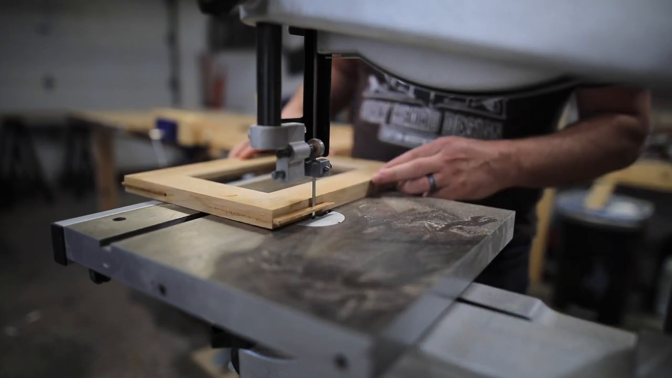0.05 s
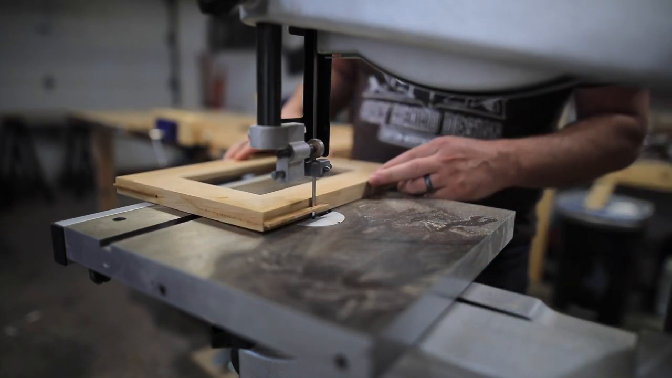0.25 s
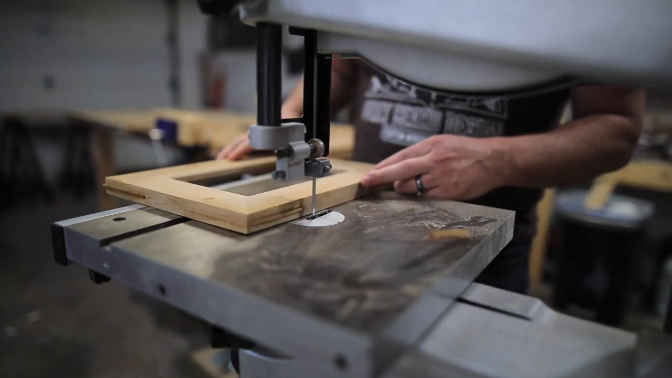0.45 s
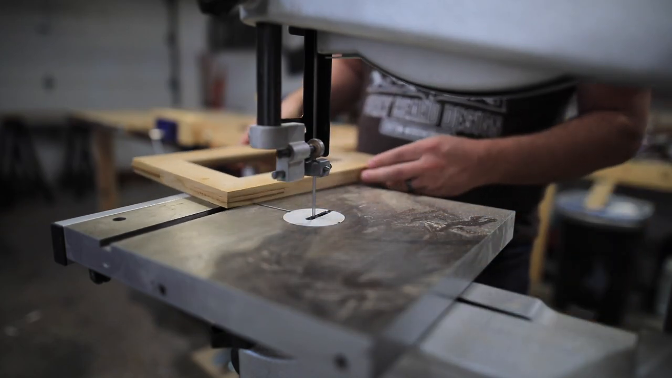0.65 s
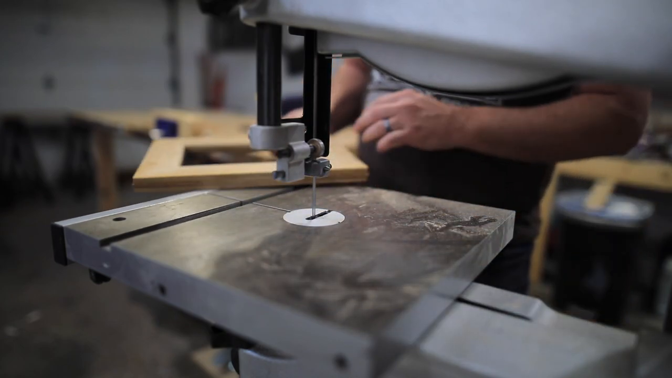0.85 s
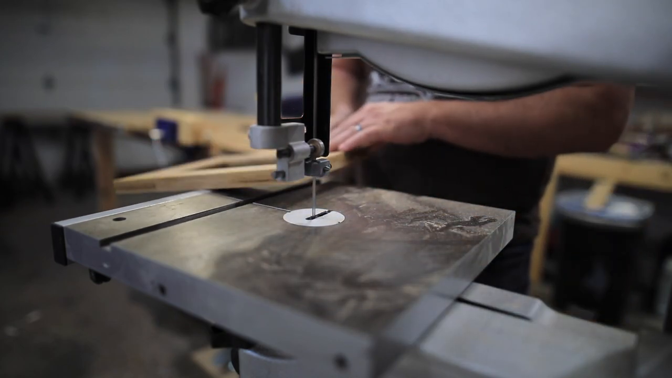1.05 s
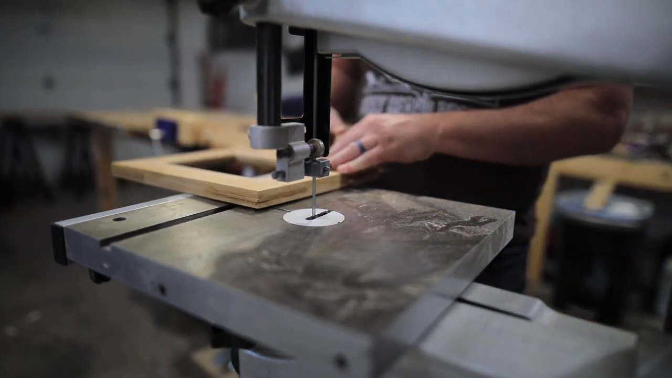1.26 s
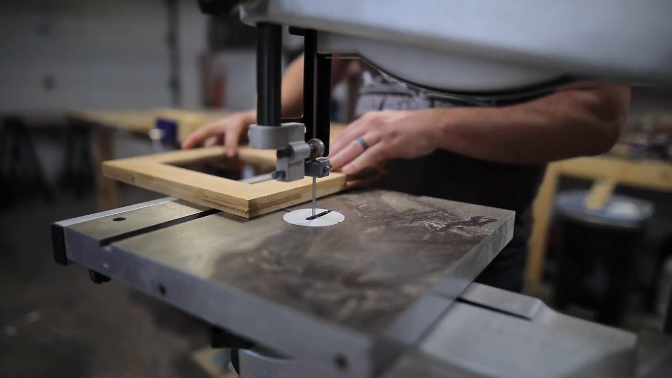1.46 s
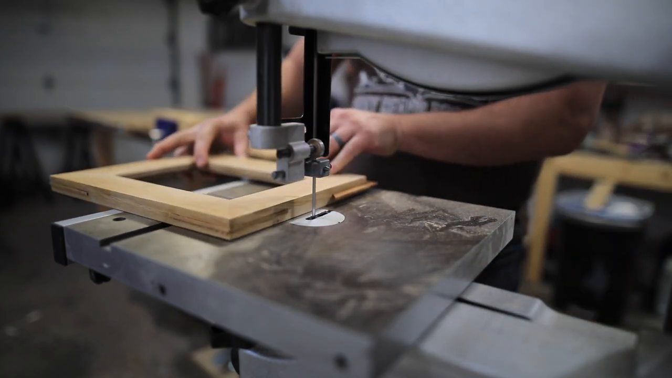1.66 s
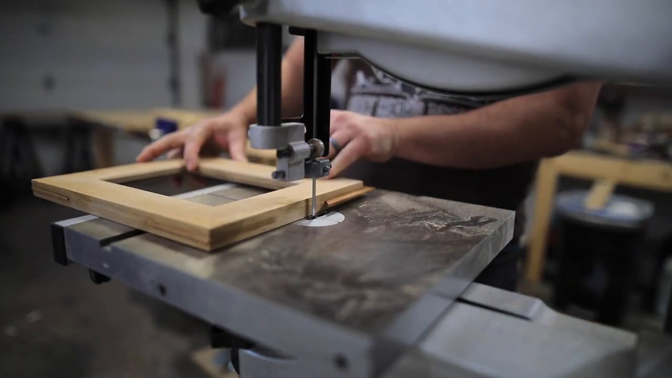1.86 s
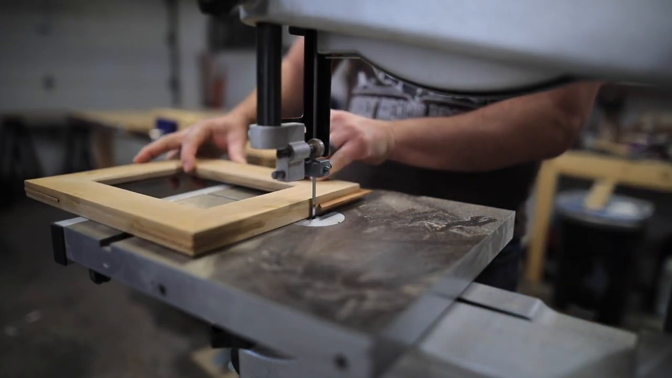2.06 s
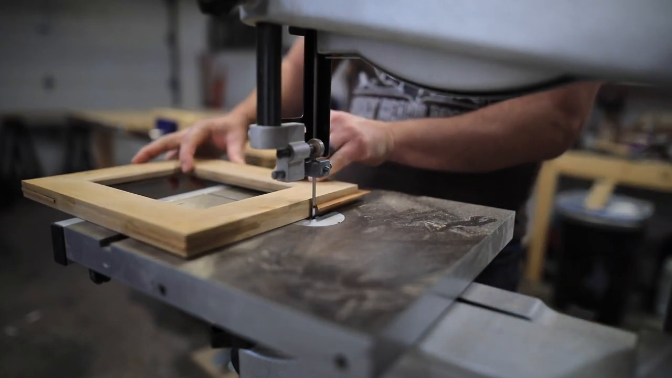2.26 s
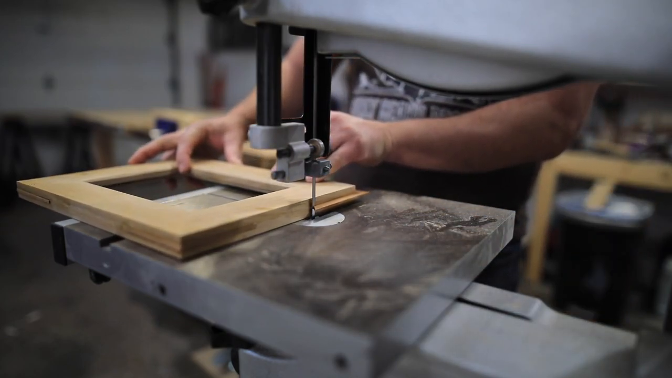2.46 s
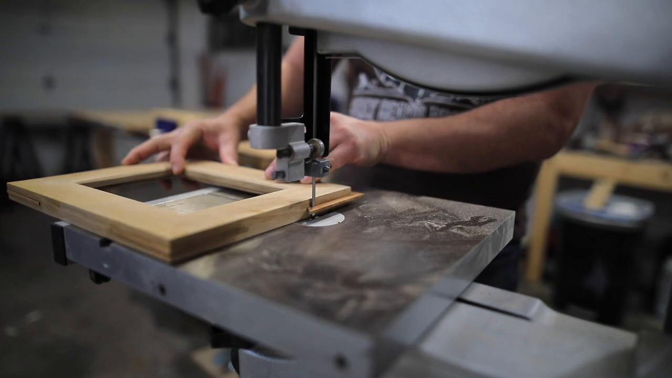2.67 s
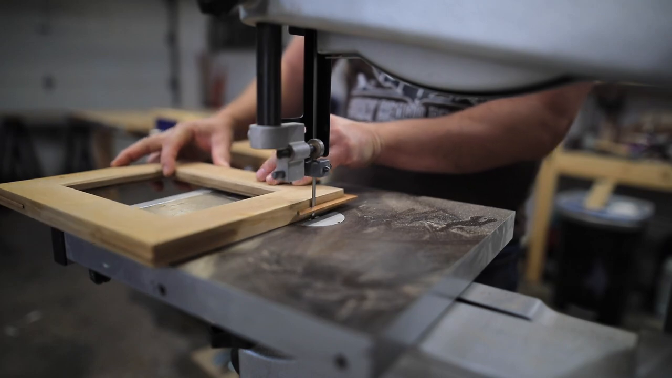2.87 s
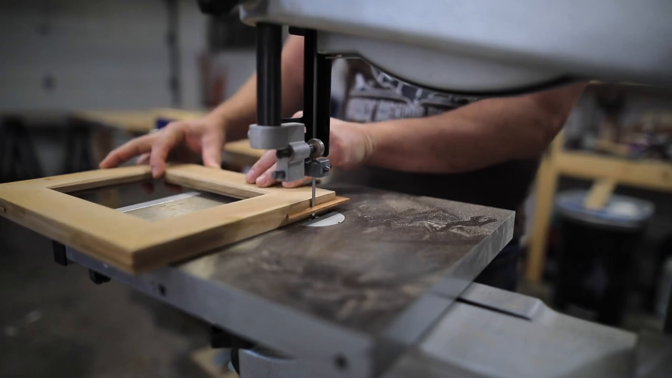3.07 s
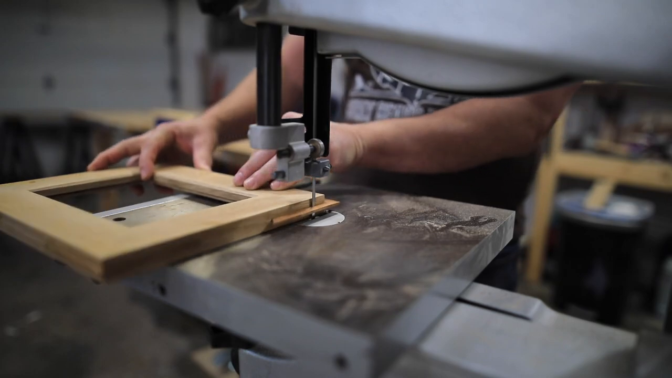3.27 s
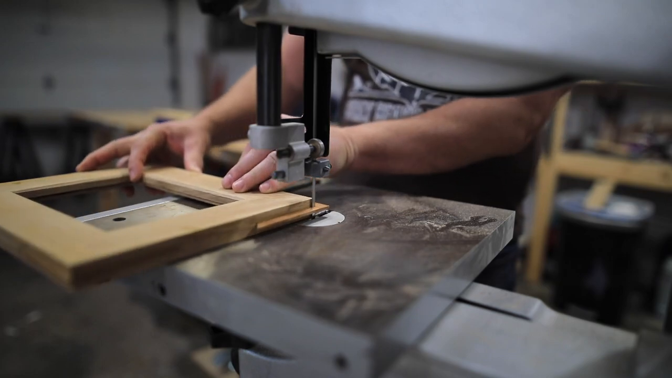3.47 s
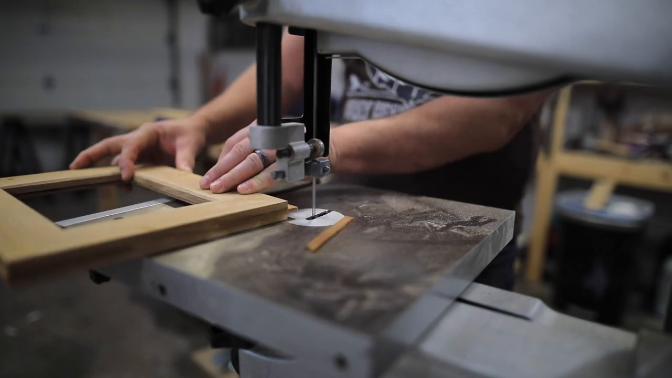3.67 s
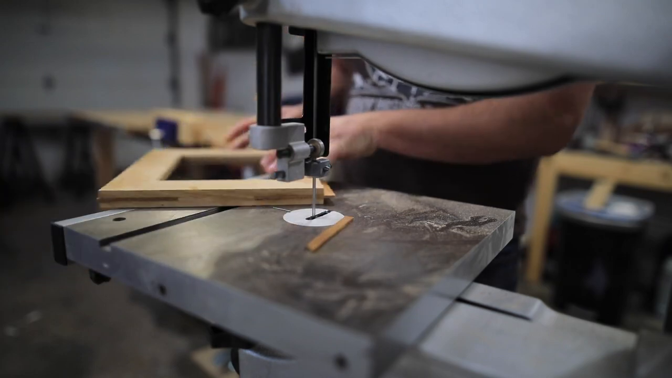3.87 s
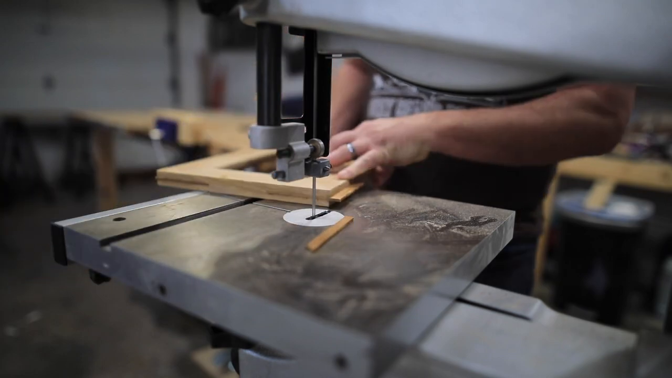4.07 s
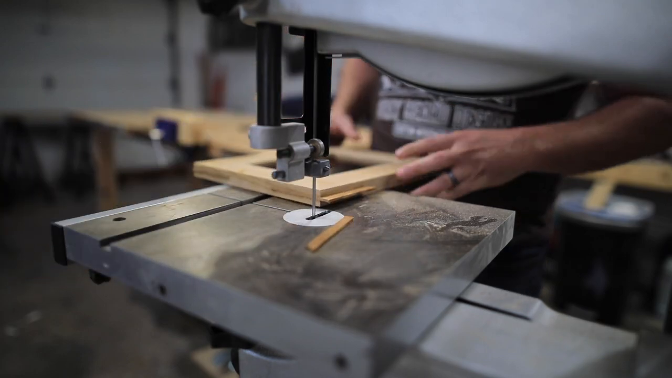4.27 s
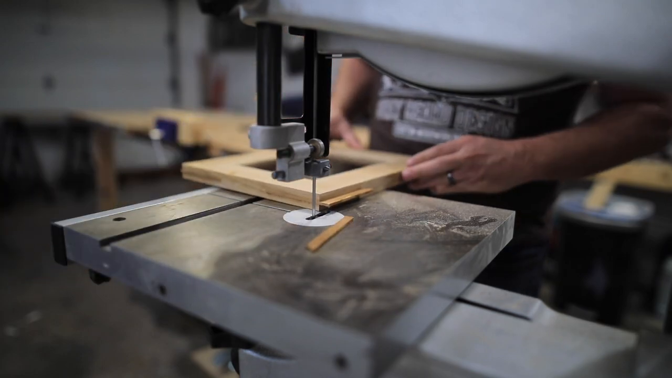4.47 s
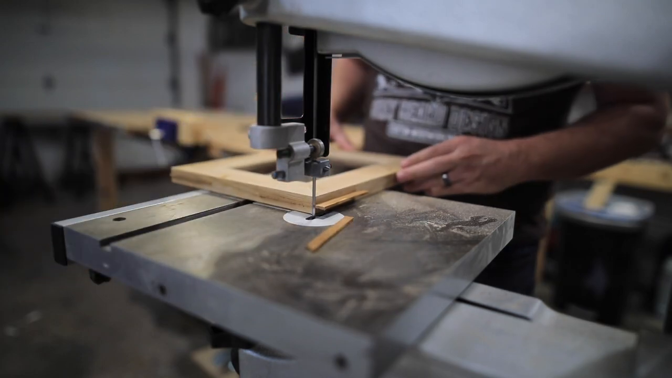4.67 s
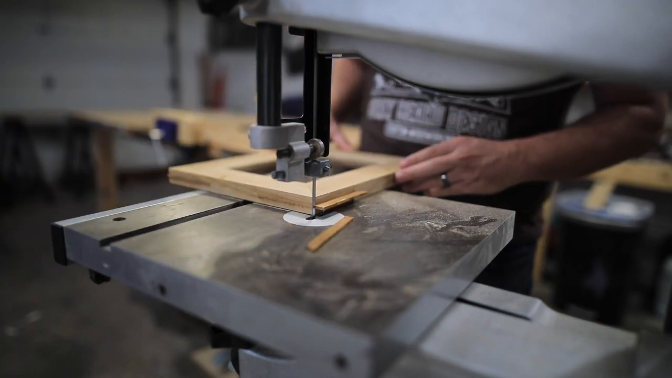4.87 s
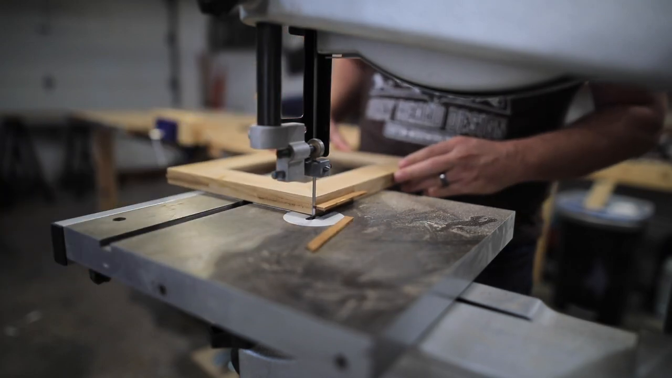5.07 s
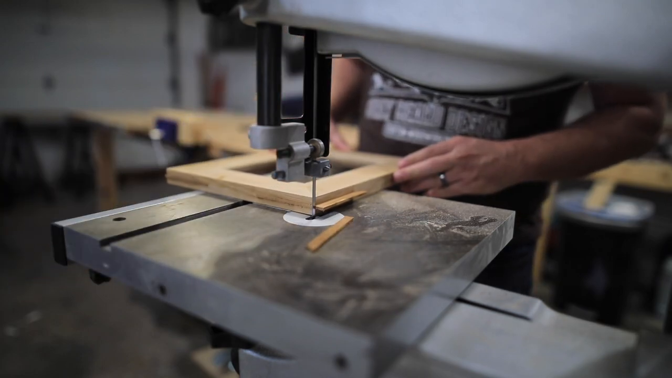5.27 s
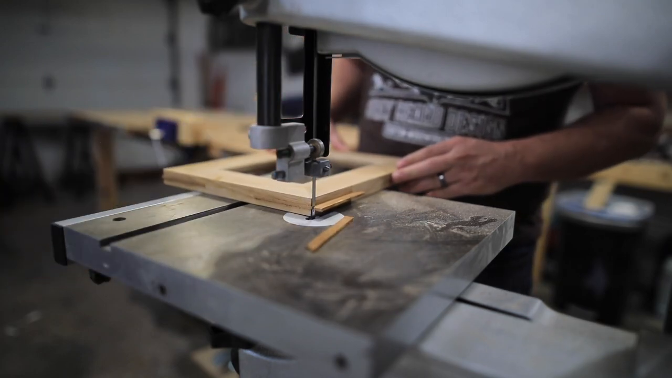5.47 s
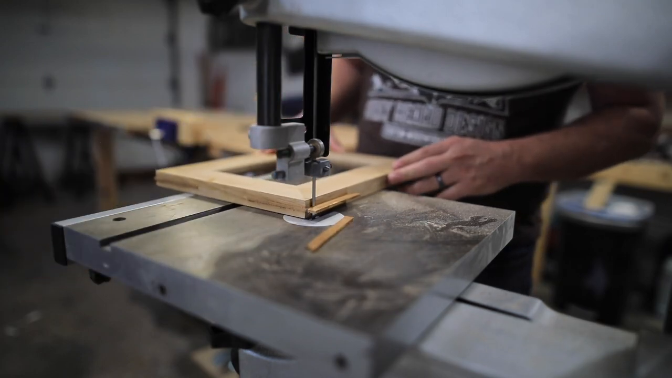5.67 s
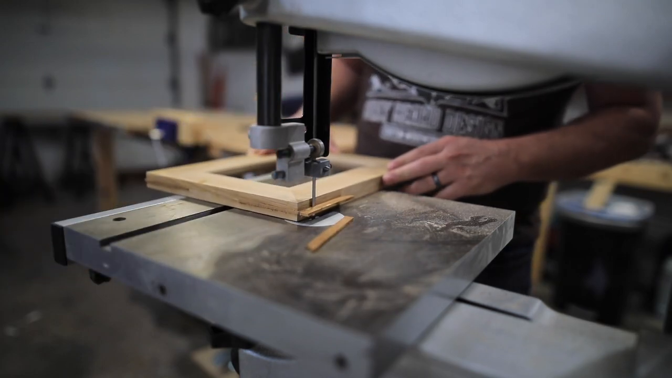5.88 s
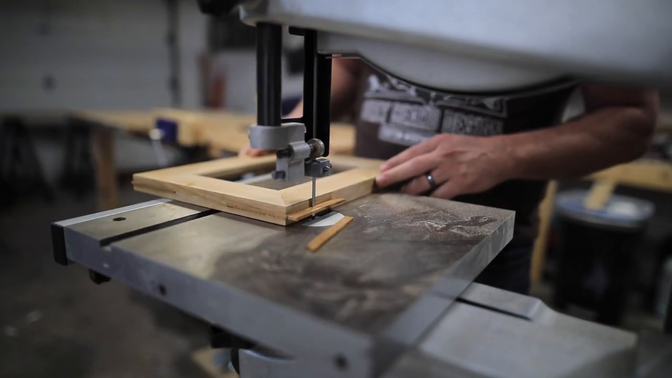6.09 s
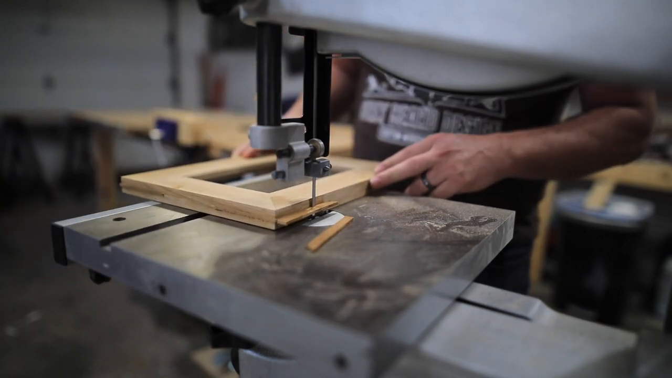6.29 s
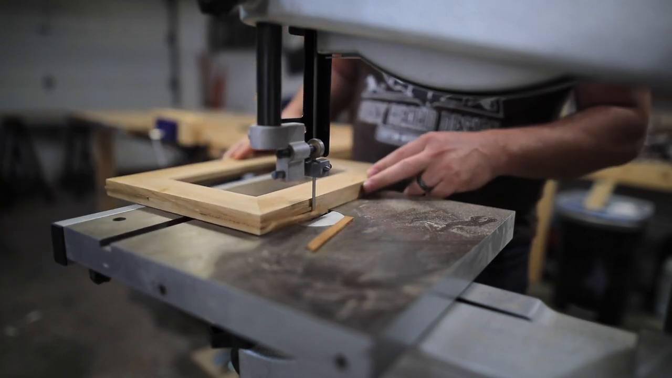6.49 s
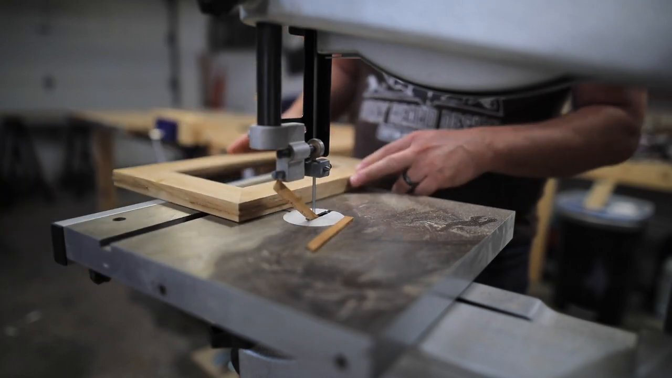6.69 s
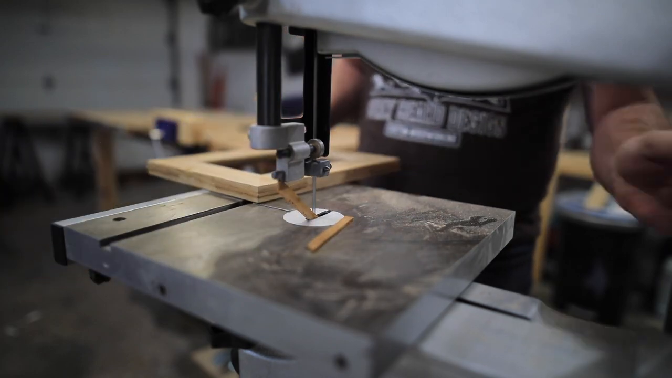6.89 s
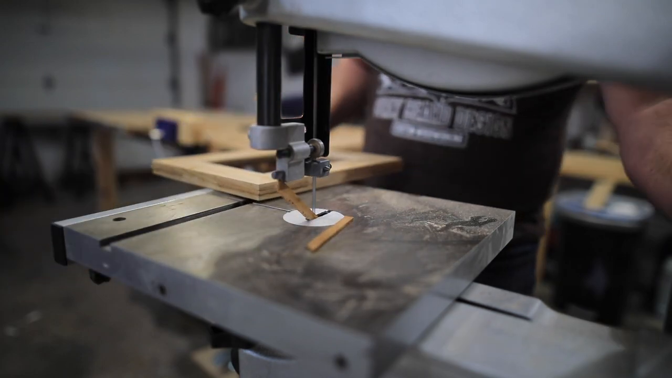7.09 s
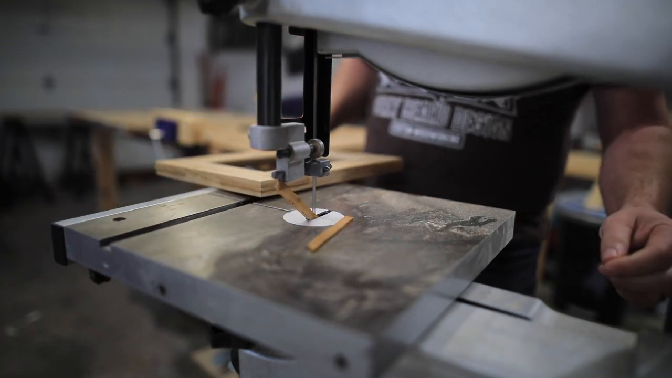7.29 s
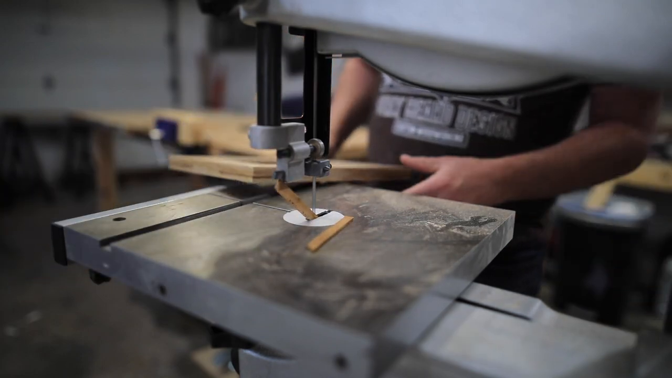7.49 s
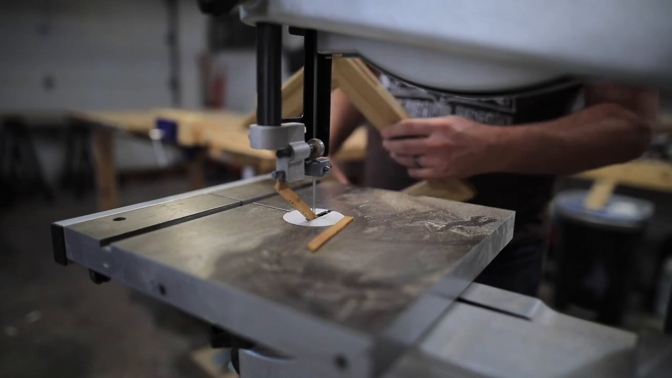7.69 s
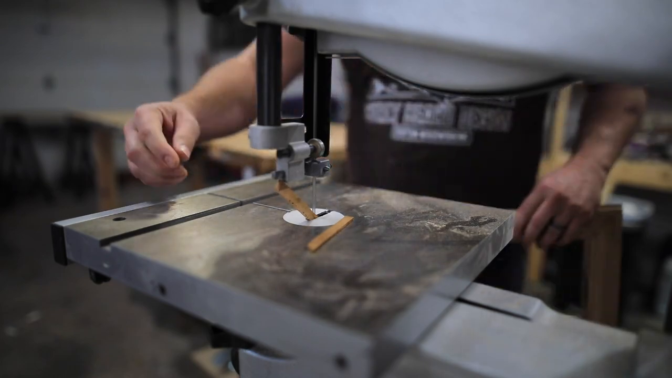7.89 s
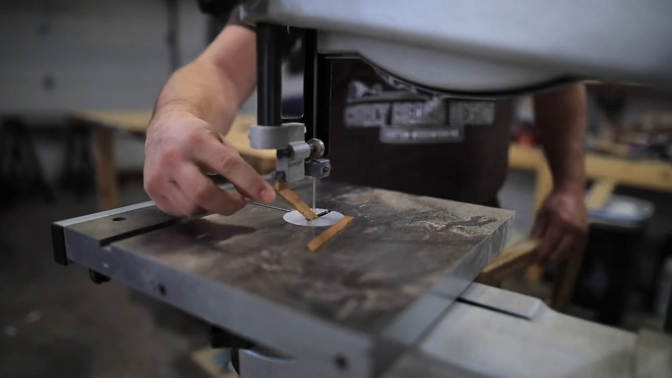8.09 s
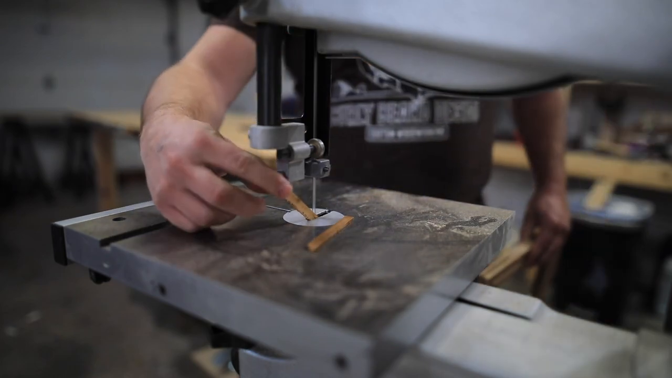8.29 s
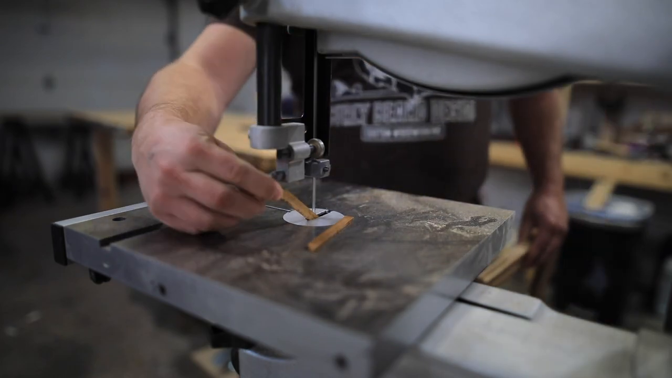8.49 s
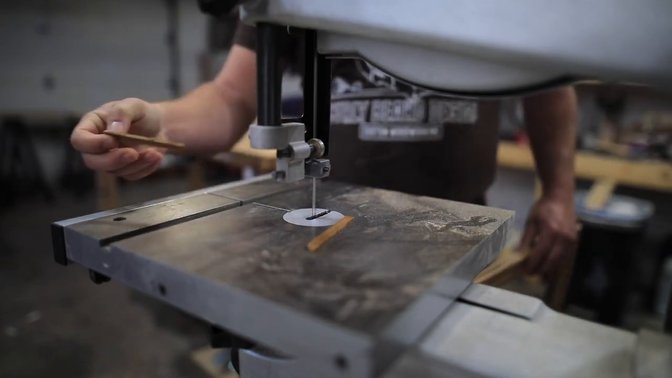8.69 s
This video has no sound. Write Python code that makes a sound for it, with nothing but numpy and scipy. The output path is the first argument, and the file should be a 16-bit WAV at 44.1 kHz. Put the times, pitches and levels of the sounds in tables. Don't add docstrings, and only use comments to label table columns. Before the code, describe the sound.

Shrill, rough metallic squealing as a saw blade bites wood in bursts, humming and hissing between cuts, before the machine winds down amid small wooden knocks.

```python
import sys
import numpy as np
from scipy import signal
from scipy.fft import rfft, irfft, next_fast_len
from scipy.io import wavfile
from scipy.ndimage import uniform_filter1d, map_coordinates

SR = 44100
rng = np.random.default_rng(int(sys.argv[2]) if len(sys.argv) > 2 else 0)


def to_linear_factor(level_db):
    exponent = np.asarray(level_db, float) / 20
    return 10 ** exponent


def generate_wav(signal):
    frames = np.transpose(np.atleast_2d(signal))
    scaled = np.clip(frames, -1, 1) * 32767
    pcm = np.round(scaled).astype(np.int16)
    wavfile.write(sys.argv[1], SR, pcm)


N = 385421
TIME = np.arange(N) / SR
SPIN_HZ = 104.35
SWITCH_OFF_S, HUM_DIES_S = 7.08, 0.062


def unit(x):
    return x / np.sqrt(np.mean(np.abs(x) ** 2) + 1e-20)


def curves(rows):
    s, *cols = np.transpose(rows)
    return [np.interp(TIME, s, c) for c in cols]


def ramp(s, length):
    return np.clip((TIME - s) / length, 0, 1)


def swell(s, length, db):
    return to_linear_factor(db) * np.exp(-((TIME - s) / length) ** 2)


def flares(rows):
    return sum(swell(*row) for row in rows)


def wobble(rate):
    return map_coordinates(rng.standard_normal(int(N * rate / SR) + 4), [TIME * rate])


def fuzz(width_hz, count=N):
    m = next_fast_len(count + 4096)
    bell = np.exp(-np.log(4) * (np.fft.fftfreq(m, 1 / SR) / width_hz) ** 2)
    noise = rng.standard_normal(m) + 1j * rng.standard_normal(m)
    return unit(np.fft.ifft(bell * noise)[:count])


def tone(hz):
    return np.sqrt(2) * np.exp(2j * np.pi * np.cumsum(hz + np.zeros(N)) / SR)


def band(hz, width_hz):
    phasor = np.sqrt(2) * np.exp(2j * np.pi * np.cumsum(hz) / SR)
    return (fuzz(width_hz, count=len(hz)) * phasor).real


def resonance(modes, hz):
    return sum(to_linear_factor(2 * db) / (1 + (2 * (hz - c) / w) ** 2) ** 2 for c, w, db in modes)


def rush(spectrum=None, modes=()):
    m = next_fast_len(N)
    f = np.fft.rfftfreq(m, 1 / SR) + 1
    power = resonance(modes, f)
    if spectrum:
        hz, db = np.transpose(spectrum)
        power = to_linear_factor(2 * np.interp(np.log(f), np.log(hz), db, left=-120, right=-120))
    return unit(irfft(rfft(rng.standard_normal(m)) * np.sqrt(power), m)[:N])


def patchy(x, depth_db):
    z = signal.stft(x, nperseg=512)[2]
    field = uniform_filter1d(rng.standard_normal(z.shape), size=4, axis=0)
    field = uniform_filter1d(field, size=8, axis=1)
    return unit(signal.istft(z * to_linear_factor(depth_db * unit(field)), nperseg=512)[1][:N])


# t/s, share of full speed
SPEED = [(0, 1), (7.05, 1), (7.75, 0.47), (8.5, 0.002), (8.74, 0.003)]
# t/s, hum level/dB
STRAIN = [(0.0, -47), (0.2, -46), (0.87, -50.5), (1.87, -52.5), (2.3, -51.5), (2.63, -46.5), (2.94, -48.5),
          (3.55, -47.5), (3.63, -53), (3.78, -50), (4.0, -49), (4.25, -49.5), (4.97, -50), (5.5, -47),
          (6.52, -46.5), (7.08, -50.5)]
STRAIN_REST_DB = -50


def running(rest_db, follows, slowing_db, stop_db):
    strain_db = (curves(STRAIN)[0] - STRAIN_REST_DB) * (1 - ramp(SWITCH_OFF_S, HUM_DIES_S))
    coasting_db = slowing_db * np.log10(curves(SPEED)[0] + 0.0063)
    return to_linear_factor(rest_db + follows * strain_db + coasting_db - stop_db * ramp(8.4, 0.11))


# t/s, squeal level/dB
CUTS = [
    [(0.0, -30.5), (0.1, -34), (0.17, -27.5), (0.39, -41), (0.43, -34), (0.48, -53.5)],
    [(2.395, -52), (2.44, -39), (2.56, -24.5), (2.985, -25), (2.998, -29), (3.05, -26), (3.29, -30),
     (3.53, -26), (3.66, -60)],
    [(4.895, -58), (4.92, -35), (4.985, -54), (5.008, -29.5), (5.045, -37.5), (5.075, -32), (5.135, -42),
     (5.155, -33.5), (5.185, -51)],
    [(5.36, -35.5), (5.52, -27.5), (5.66, -30.5), (5.88, -39.5), (6.07, -26.5), (6.325, -25), (6.35, -39),
     (6.57, -28.5), (6.64, -64.5)],
]


def load():
    gate = 0
    for rows in CUTS:
        start, end = rows[0][0], rows[-1][0]
        edge = np.minimum(TIME - start + (start == 0), end - TIME)
        gate = gate + np.clip(edge / 0.019, 0, 1)
    return gate


# f/Hz, width/Hz, steady share 0-1, level/dB of sidebands at -2..2 times twice the spin
SQUEAL = [(8149, 26, .8, [-20, -13, 0, -16, -27]), (8174, 20, .7, [-21, -14, -9, -19, -29]),
          (8125, 24, .5, [-27, -23, -11, -21, -40]), (8059, 14, .5, [-34, -26, -24, -26, -40]),
          (8155, 90, .0, [-25, -19, -9, -20, -34]), (8080, 400, .0, [-40, -40, -16, -40, -40]),
          (8449, 10, .6, [-60, -60, -25, -60, -60])]


def squeal():
    out = 0
    for hz, width_hz, steady, sidebands_db in SQUEAL:
        chop = 0
        for order, db in zip(range(-2, 3), sidebands_db):
            chop = chop + to_linear_factor(db) * 1j ** (abs(order) * 2 / 3) * tone(2 * order * SPIN_HZ)
        strength = steady + (1 - steady) * fuzz(width_hz)
        out = out + strength * chop * tone(hz + 2.68 * wobble(12))
    return unit(out.real)


# f/Hz, level/dB
IDLE = [(2500, -12), (4800, -22), (6000, -11.5), (6500, -15.5), (9200, -11), (12200, -20), (13450, -26),
        (13600, -24.5), (15800, -30)]
# f/Hz, width/Hz, level/dB
GUIDES = [(5160, 70, -5.5), (6880, 200, 4), (7970, 220, 2.5), (9200, 130, 4), (9350, 100, 5),
          (10820, 80, 8), (11700, 82, 2.5), (11920, 220, 5), (12600, 250, 0), (14100, 126, -3.5)]
# f/Hz, width/Hz, level/dB
FRAME = [(2523, 40, -2.5), (3140, 35, -4.5), (3300, 52, -1), (3895, 110, 1.5), (4260, 30, 0),
         (4900, 30, -15), (5190, 280, -8)]


def idle_rub(gate):
    idle = to_linear_factor(2.0) * patchy(rush(IDLE), depth_db=2.5) + rush(modes=GUIDES)
    idle = idle + to_linear_factor(-7.5) * rush(modes=FRAME)
    wedged = to_linear_factor(-7.0) * rush([(9000, -19), (12500, -6), (13500, 5.0), (15800, -2)])
    wedged = (TIME > CUTS[-1][-1][0]) * wedged
    friction = running(rest_db=-54, follows=1, slowing_db=20.5, stop_db=-10)
    return friction * ((1 - gate) * idle + wedged)


# f/Hz, level/dB
KERF = [(6000, -28), (7300, 5.5), (8800, 5.5), (9300, 3), (11000, -1.5), (13000, -10), (14000, -11),
        (15800, -8)]
# f/Hz, level/dB
RASP = [(1200, -9.5), (2200, -5), (4000, -1.5), (5400, 2), (6500, 3.5), (7400, -8), (8500, -39)]
# f/Hz, width/Hz, level/dB
GRAIN = [(2320, 56, -9), (2795, 28, -3.5), (3140, 60, -7.5), (4040, 51, -1), (4250, 22, -3.5),
         (4450, 17, -10), (4830, 26, -11), (5050, 42, -8), (5390, 29, -1.5), (5520, 27, -1), (5720, 37, -3),
         (6030, 46, -6), (6590, 66, -6)]
# t/s, length/s, level/dB
SQUEAL_FLARES = [(2.416, 0.0068, -31), (2.68, 0.0099, -35), (2.984, 0.012, -30), (3.45, 0.057, -36),
                 (6.56, 0.018, -30)]
LOWER_FLARES = [(.2, 0.42, -51), (2.66, 0.054, -47), (3.445, 0.11, -40.5), (4.93, 0.018, -49),
                (5.06, 0.055, -51), (5.563, 0.16, -42.5), (6.55, 0.05, -53)]
UPPER_FLARES = [(2.86, 0.074, -47), (3.581, 0.059, -29), (5.14, 0.025, -49), (6.3, 0.13, -60)]
RASP_FLARES = [(3.3, 0.28, -51), (3.6, 0.037, -50), (5.55, 0.18, -51)]
KERF_FLARES = [(.45, 0.05, -57), (3.63, 0.015, -49), (5.09, 0.1, -50), (5.45, 0.024, -38),
               (2.415, 0.0043, -57), (6.6, .03, -63)]


def cutting():
    squeal_db, = curves(np.concatenate(CUTS))

    def bitten(level_db, share, jolts):
        return to_linear_factor(level_db + share * (squeal_db + 30)) + flares(jolts)

    whine = (to_linear_factor(squeal_db + 0.25 * wobble(25)) + flares(SQUEAL_FLARES)) * squeal()
    lower = rush(modes=[(7000, 150, 12.0), (7200, 180, -14.5)])
    upper = rush(modes=[(12400, 44, 15.0), (12300, 150, 4), (12650, 170, 6.5), (11100, 70, -13.0)])
    rings = bitten(-53, 0.12, LOWER_FLARES) * to_linear_factor(2.5 * wobble(30)) * lower
    rings = rings + bitten(-53.5, 0.15, UPPER_FLARES) * to_linear_factor(1.54 * wobble(22)) * upper
    rasp = 0.8 * patchy(rush(RASP), depth_db=2.5) + 0.6 * patchy(rush(modes=GRAIN), depth_db=3)
    chips = patchy(rush(KERF), depth_db=2.5)
    kerf = to_linear_factor(1.5 + wobble(30)) * chips + to_linear_factor(-6.0) * rush(modes=GUIDES)
    gate, judder = load(), to_linear_factor(0.38 * wobble(17))
    wood = whine + rings + bitten(-49.5, 0.14, RASP_FLARES) * rasp
    wood = wood + bitten(-45.5, 0.2, KERF_FLARES) * judder * kerf
    return gate * wood + judder * idle_rub(gate)


# start t/s, end t/s, start f/Hz, end f/Hz, level/dB
CHIRPS = [(2.534, 2.653, 15700, 9100, -39), (2.798, 2.974, 15200, 8900, -43.5),
          (3.061, 3.21, 16200, 10600, -36), (3.2, 3.336, 15000, 13400, -45.5),
          (3.358, 3.46, 15300, 12000, -46), (2.476, 2.527, 15600, 14600, -48.5),
          (2.86, 2.946, 14500, 12600, -48), (3.18, 3.25, 15700, 14300, -50),
          (5.902, 5.93, 4500, 4100, -53.5), (3.5, 3.615, 6400, 4450, -38.5),
          (3.62, 3.67, 4450, 4350, -47.5), (3.606, 3.63, 12000, 11200, -29),
          (5.072, 5.118, 10900, 10200, -41), (5.53, 5.63, 7300, 6350, -41.5),
          (5.59, 5.635, 5300, 4900, -46), (5.64, 5.7, 5600, 4800, -44), (3.57, 3.62, 3100, 2200, -38),
          (5.605, 5.722, 15200, 14300, -48), (5.814, 5.88, 15300, 13500, -46),
          (6.016, 6.14, 16000, 13300, -41), (6.2, 6.32, 14700, 14000, -46),
          (0.438, 0.501, 10300, 10400, -50), (.44, 0.51, 14900, 14700, -52),
          (6.572, 6.62, 15200, 14600, -43.5)]
# f/Hz, width/Hz, level/dB
STEEL = [(4200, 590, 5), (4800, 400, -4), (5330, 840, -5), (6620, 200, 1), (10400, 190, 2.5),
         (11300, 500, -4.5), (12250, 330, 6.5), (13700, 390, -0.5), (14630, 360, -0.5), (15700, 500, 2.5),
         (9970, 11000, -12)]


def whistles():
    stray = []
    for rows in CUTS:
        starts = np.arange(rows[0][0], rows[-1][0] - 0.08, 0.05)
        for s, (u, v, w) in zip(starts, rng.random((40, 3))):
            stray.append((s, s + 0.045 + 0.03 * u, 11500 + 4300 * v, 10500 + 4000 * v, -58 + 6 * w))
    out = np.zeros(N)
    for start, end, hz0, hz1, db in list(CHIRPS) + stray:
        a, b = round(start * SR), round(end * SR)
        glide = np.linspace(hz0, hz1, b - a)
        width_hz = 0.026 * hz1 + 0.04 * abs(hz0 - hz1)
        out[a:b] += to_linear_factor(db + 2.5) * np.hanning(b - a) ** 0.25 * band(glide, width_hz)
    m = next_fast_len(N)
    steel = np.sqrt(resonance(STEEL, np.fft.rfftfreq(m, 1 / SR)))
    return to_linear_factor(2.4 * wobble(55)) * irfft(rfft(out, m) * steel, m)[:N]


# t/s, length/s, f/Hz, level/dB
SONGS = [(0.43, .012, 4050, -50), (3.05, .5, 2794, -60), (3.0, .5, 4269, -59), (3.0, .4, 5335, -57),
         (3.08, .05, 13600, -50), (3.2, .22, 2340, -56), (3.31, .04, 13700, -45), (3.52, .12, 15100, -53),
         (3.565, .02, 4150, -51), (3.62, .03, 4190, -43), (3.61, .06, 4190, -50), (3.6, .015, 5800, -47),
         (3.63, .012, 6500, -47), (3.615, .018, 4550, -43), (3.62, .02, 14700, -45),
         (3.62, .02, 10400, -44), (3.635, .008, 11300, -42), (3.822, .049, 1064, -41),
         (5.075, .015, 9700, -46), (5.14, .04, 4090, -51), (5.445, .015, 4090, -49),
         (5.45, .015, 9300, -42), (5.46, .015, 11900, -44), (5.62, .16, 4070, -54), (5.82, .19, 2790, -53),
         (6.05, .4, 4050, -56), (6.0, .4, 4270, -59), (5.06, .08, 4080, -55), (2.11, .012, 14100, -54),
         (5.46, .025, 1740, -45), (5.45, .02, 1310, -48), (7.55, .3, 1525, -60), (5.68, .06, 9650, -53),
         (5.41, .04, 10400, -53), (6.0, .4, 12150, -57), (6.23, .07, 4040, -50), (6.26, .06, 14500, -49),
         (6.56, .06, 4040, -50), (7.65, .025, 1820, -52), (8.3, .22, 1660, -65), (8.62, .15, 1150, -72),
         (7.75, .35, 1185, -56)]


def singing():
    out = 0
    for s, length, hz, db in SONGS:
        steady = np.clip(length / 0.15, 0.3, 0.85)
        strength = steady + (1.1 - steady) * fuzz(0.02 * hz)
        out = out + swell(s, length, db) * (strength * tone(hz)).real
    return to_linear_factor(1.8 * wobble(28)) * out


def belt():
    return np.exp(-2j * np.pi * 34.5 * (TIME - 3.781))


# t/s, length/s, first twang level/dB, second twang level/dB
TWANG = [(0.257, 0.064, -52, -39.5), (0.582, 0.16, -52, -35.5), (1.1, 0.57, -59, -56.5),
         (3.404, 0.11, -54.5, -49), (3.78, 0.098, -57, -39.5), (4.25, 0.28, -54, -56.5),
         (4.695, 0.18, -60, -52), (5.25, 0.2, -53.5, -46), (6.6, 0.5, -64, -89), (7.56, 0.036, -62, -46)]


def blade():
    low_gain = running(rest_db=-59.5, follows=0.54, slowing_db=10, stop_db=12)
    high_gain = running(rest_db=-56, follows=0.15, slowing_db=14.5, stop_db=-6)
    for s, length, low_db, high_db in TWANG:
        low_gain = low_gain + swell(s, length, low_db)
        high_gain = high_gain + swell(s, length, high_db)
    lap_s = 0.247
    lap = (1 - 0.79 * load()) * (np.cos(2 * np.pi * (TIME - 3.81) / lap_s) - 1) / 2
    beat = 1 + (0.23 + swell(4.4, 1.0, -4.5)) * belt() + 0.12 / belt()
    low = low_gain * to_linear_factor(2.5 + 14 * lap ** 2 * np.sign(lap)) * tone(902 + 1.096 * wobble(7.3))
    high = high_gain * to_linear_factor(1.0 + 13 * lap + 0.58 * wobble(35)) * beat * tone(1806 + 1.4 * wobble(8))
    return (low + high).real


# rest f/Hz, split in bearing turns, width/Hz, level/dB
RACES = [(5625, -1, 45, -1), (5628, 1, 45, -1), (5945, 2, 40, -8), (3280, 6, 80, -12), (6154, 0, 28, -7)]
# t/s, length/s, level/dB
BEARING_FLARES = [(.1, 0.17, -53), (3.97, 0.055, -41.5), (4.23, 0.024, -46)]


def bearings():
    speed, = curves(SPEED)
    rings = sum(to_linear_factor(db) * fuzz(w) * tone(hz + k * SPIN_HZ * speed) for hz, k, w, db in RACES)
    steady = running(rest_db=-54.5, follows=0.53, slowing_db=25, stop_db=9) * to_linear_factor(0.61 * wobble(7))
    return (steady + to_linear_factor(-5.5) * flares(BEARING_FLARES)) * rings.real


# f/Hz, level/dB
HUM = [(300, -14), (600, 0), (754, -12), (1216, -9), (2009, -15.5)]
# f/Hz, width/Hz, level/dB
CABINET = [(790, 56, 0.5), (941, 16, 3), (1209.6, 23.4, 7.5), (1146, 65, 4.5), (1465, 150, -9),
           (1444, 5.3, 2.5), (1806, 220, -5), (2516, 51, -8.5), (3188, 130, -8.5)]
# f/Hz, spectral level/dB
HOUSING = [(200, -21.5), (400, -18.5), (525, -20.5), (550, -7), (700, -10), (1020, -9.5), (1300, -10),
           (1620, -11.5), (2000, -5.5), (2120, -17), (6000, -17.5)]
# t/s, share 0-1
SHIFT = [(0, 0.8), (.45, 0.8), (.7, 0), (2.39, .1), (2.53, 1), (3.6, .95), (3.67, 0.1), (5.45, 0.04),
         (5.7, 0.8), (6.6, 0.83), (6.75, 0.36), (8.74, 0.32)]


def motor():
    hum = sum(to_linear_factor(db + 1.73 * wobble(9)) * tone(hz + 0.96 * wobble(6)).real for hz, db in HUM)
    loaded = np.clip(curves(SHIFT)[0], 0, 1)
    free_panel = (1 + 0.38 * belt().real) * rush(modes=[(1090, 32, 0)])
    loaded_panel = rush(modes=[(1155.6, 21.5, 2), (2353, 76, -21), (2700, 230, -25.5)])
    panel = to_linear_factor(-1.0) * (1 - loaded) * free_panel + to_linear_factor(-1.5) * loaded * loaded_panel
    housing_db = -0.82 + 1.84 * load() - 7.3 * (1 - curves(SPEED)[0])
    rattle = rush(modes=CABINET) + to_linear_factor(2.7 * wobble(17)) * panel
    rattle = rattle + to_linear_factor(housing_db) * patchy(rush(HOUSING), depth_db=2.1)
    powered = to_linear_factor(STRAIN_REST_DB - 12.5 * ramp(SWITCH_OFF_S, HUM_DIES_S))
    hum = powered * running(rest_db=0.5, follows=1.44, slowing_db=11.5, stop_db=9) * hum
    return hum + running(rest_db=-48.5, follows=0.64, slowing_db=7.5, stop_db=11) * rattle


# f/Hz, width/Hz, level/dB
OBJECTS = [
    [(2370, 340, 1.5), (3680, 1200, -0.5), (4430, 450, 1), (5040, 400, 1), (7200, 540, -3), (8000, 440, -2),
     (9500, 460, -11), (1490, 2300, -11), (6100, 950, -5)],
    [(1710, 88, -3), (1937, 120, 4), (2000, 95, -6), (1460, 160, -11), (3550, 200, -16.5), (4000, 150, -13),
     (4370, 160, -16.5)],
    [(1500, 700, -12.5), (6500, 370, 13), (8900, 880, -3), (12000, 1200, 7), (14800, 1200, -5),
     (7970, 15000, 10)],
]
# t/s, rise/s, length/s, level/dB, object index
KNOCKS = [(1.215, 0.0011, 0.022, -32.5, 0), (1.592, .004, 0.02, -52, 0), (6.57, .006, 0.032, -38.5, 2),
          (7.505, 0.006, 0.02, -39, 1), (7.526, 0.003, 0.032, -34, 1), (7.555, 0.017, 0.037, -35.5, 1),
          (7.833, 0.0025, .012, -60, 2), (7.994, 0.0022, 0.015, -55, 2), (8.164, .005, 0.028, -57, 2),
          (8.209, .01, 0.043, -55.5, 2), (8.304, 0.012, 0.048, -58, 2), (8.413, 0.0022, 0.014, -66.5, 2),
          (8.602, 0.0026, 0.033, -68, 2)]


def knocks():
    voices = [rush(modes=modes) for modes in OBJECTS]
    out = np.zeros(N)
    for s, rise, length, db, what in KNOCKS:
        t = np.clip(TIME - s, 0, 1)
        attack = 1 - np.exp(-(t / rise) ** 2)
        decay = to_linear_factor(-9 * (t / length) ** 2) + to_linear_factor(-8.5 - 9 * t / length)
        out += to_linear_factor(db) * attack * decay * voices[round(what)]
    return out


# f/Hz, level/dB, t60/s
CLACK = [(2350, -37, .04), (3564, -42, .06), (4150, -38, .06), (4339, -35, .07), (4520, -37, .06),
         (4936, -39, .03), (5076, -44, .13), (7250, -35, .03), (7951, -36, .04)]


def clack():
    t = np.clip(TIME - 1.216, 0, 1)
    ringing = sum(to_linear_factor(db - 60 * t / t60) * np.sin(2 * np.pi * hz * t) for hz, db, t60 in CLACK)
    return ringing * (1 - np.exp(-t / 0.00055))


# f/Hz, level/dB
DRAUGHT = [(24, -45), (45, -17.5), (110, -1), (200, -4), (300, -12), (480, -23), (560, -48)]
# start t/s, length/s, level/dB
PUFFS = [(0.05, 0.1, -51), (0.19, 0.26, -50.5), (0.47, 0.17, -54), (0.82, 0.086, -48.5), (1.085, 0.05, -59),
         (1.205, 0.027, -68), (1.24, 0.081, -48), (1.41, 0.047, -60), (1.467, 0.068, -54),
         (1.664, 0.22, -53), (2.021, 0.043, -62), (2.09, 0.06, -59), (2.164, 0.045, -61),
         (2.297, 0.065, -54), (2.403, 0.033, -54), (2.45, 0.062, -57), (2.604, 0.11, -51),
         (2.767, 0.36, -55), (3.13, 0.056, -61), (3.2, 0.13, -50), (3.435, 0.061, -60), (3.716, 0.11, -65),
         (3.803, 0.033, -51), (3.935, 0.041, -44), (4.046, 0.055, -50), (4.162, 0.065, -54),
         (4.232, 0.051, -58), (4.378, 0.097, -55.5), (4.546, 0.12, -53), (4.764, 0.059, -60),
         (4.857, 0.043, -64), (4.958, 0.024, -57), (5.168, 0.18, -57), (5.412, 0.047, -54.5),
         (5.493, 0.038, -60), (5.6, 0.17, -58), (5.798, 0.053, -63), (5.86, 0.11, -56), (5.95, 0.029, -65),
         (6.031, 0.06, -41.5), (6.124, 0.12, -61), (6.405, 0.09, -50), (6.564, 0.15, -45.5),
         (6.728, 0.037, -70), (6.83, 0.18, -51), (7.01, 0.049, -64), (7.098, 0.12, -50.5),
         (7.285, 0.064, -48.5), (7.382, 0.08, -63), (7.484, 0.28, -50.5), (7.857, 0.16, -51.5),
         (8.062, 0.055, -51), (8.163, 0.1, -49.5), (8.283, 0.041, -50), (8.37, 0.029, -63),
         (8.445, 0.045, -59), (8.523, 0.15, -53.5), (8.677, 0.075, -60)]
# t/s, peak level/dB
THUMPS = [(0.255, -36), (0.277, -31), (0.411, -37), (2.654, -39), (3.036, -37.5), (5.666, -26.5),
          (7.496, -37), (7.579, -37), (7.69, -27), (7.739, -33)]


def draught():
    rise_s, fall_s, sag_db, thump_s = 0.013, 0.01, 8, 0.0097
    envelope = to_linear_factor(-79.5 + 2.5 * wobble(15))
    for s, length, db in PUFFS:
        first = round(s * SR)
        t = TIME[first:round((s + length + 0.1) * SR)] - s
        shape = np.clip(np.minimum(t / rise_s, 1 + (length - t) / fall_s), 0, 1)
        envelope[first:][:len(t)] += to_linear_factor(db - 1.9 - sag_db * t / length) * shape
    for s, db in THUMPS:
        u = np.clip((TIME - s) / thump_s, 0, 30)
        envelope += to_linear_factor(db - 14.5) * u * np.exp(1 - u)
    return envelope * to_linear_factor(3.3 * wobble(45) + 1.4 * wobble(18)) * rush(DRAUGHT)


def room():
    return to_linear_factor(-63.5) * rush([(25, -15.5), (80, -2), (200, -12), (480, -18.5), (700, -6.5),
                              (4000, -11.0), (8000, -31.5), (15700, -43.5)])


def scene():
    wood_and_steel = cutting() + whistles() + singing()
    machine = blade() + bearings() + motor()
    return (wood_and_steel + machine + knocks() + clack() + draught() + room())[None]


def roll_off(x):
    return signal.sosfilt(signal.butter(12, 17030, fs=SR, output="sos"), x)


def record(dry):
    m = next_fast_len(N)
    passed = np.fft.rfftfreq(m, 1 / SR) < 15760
    mix = irfft(rfft(dry, m) * passed, m)[:, :N]
    return roll_off(mix)


dry = scene()
out = record(dry)
generate_wav(out)
```